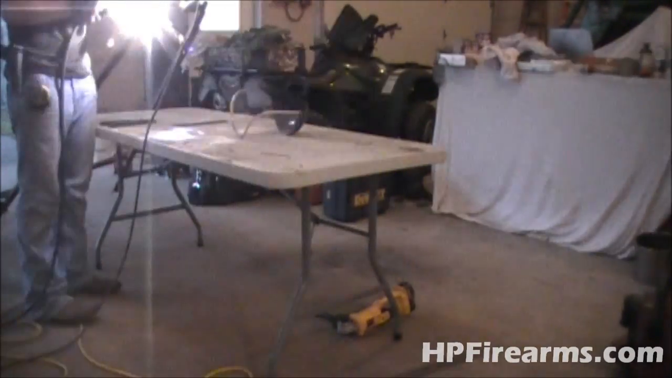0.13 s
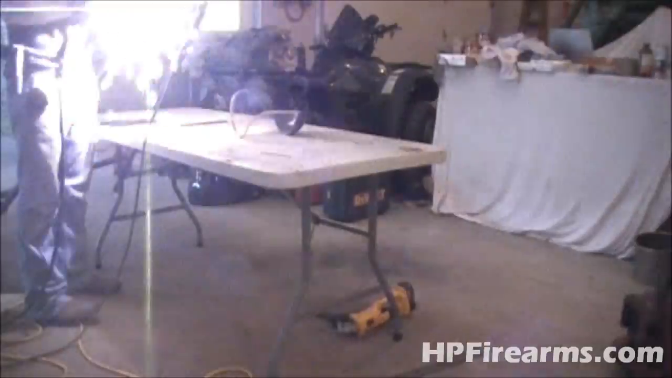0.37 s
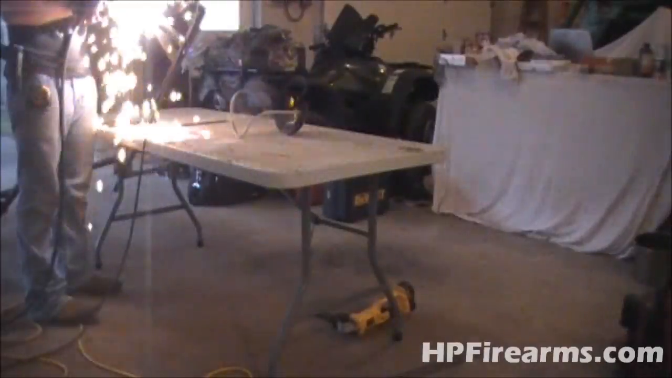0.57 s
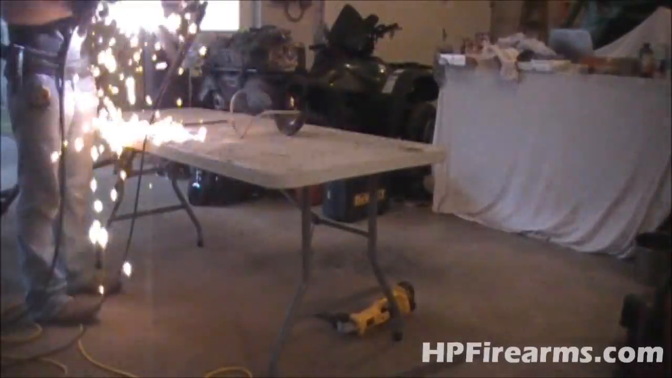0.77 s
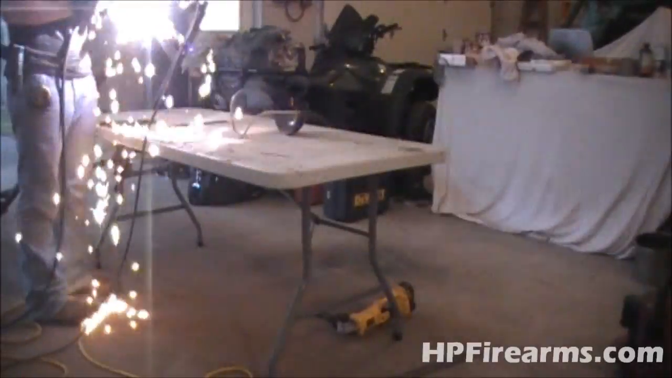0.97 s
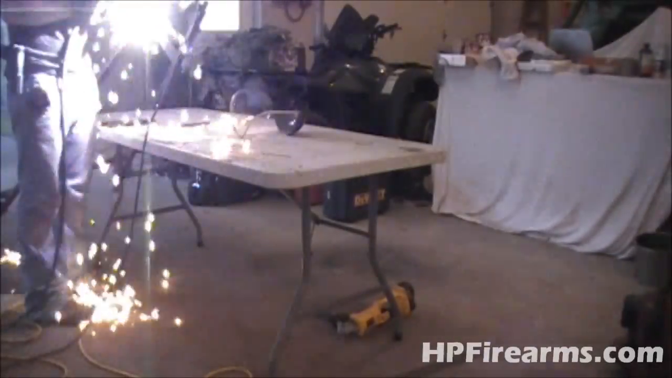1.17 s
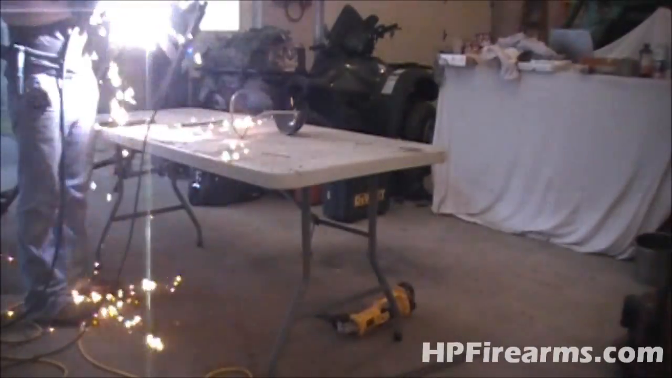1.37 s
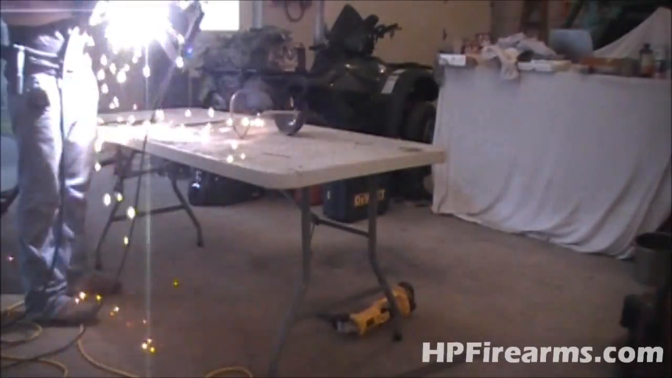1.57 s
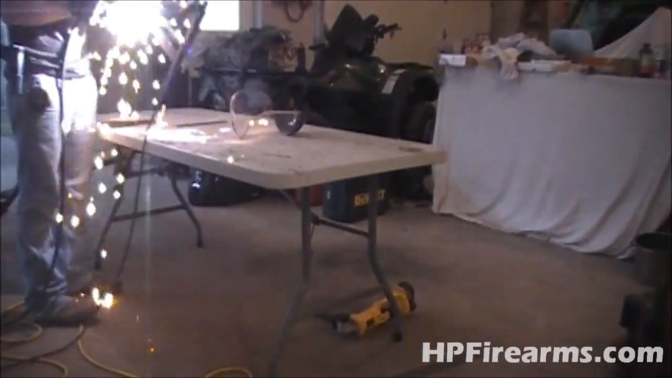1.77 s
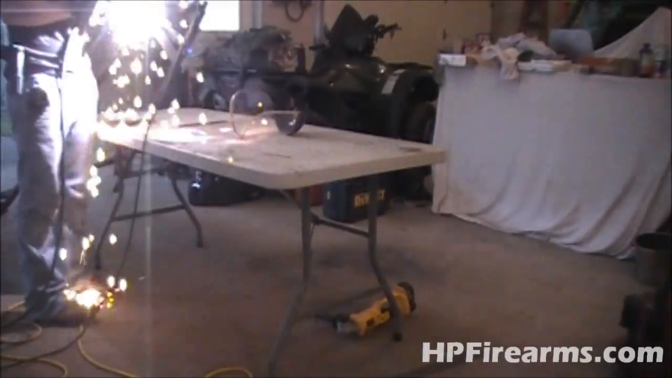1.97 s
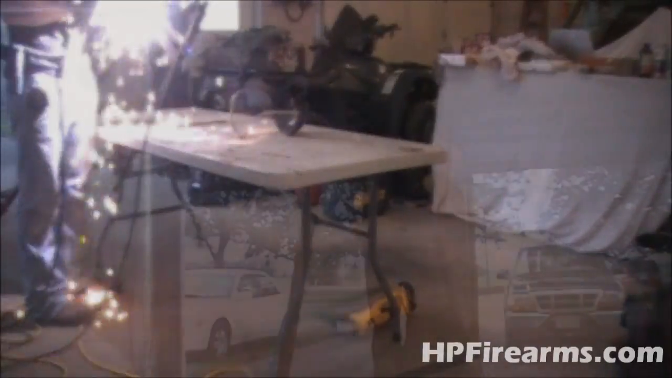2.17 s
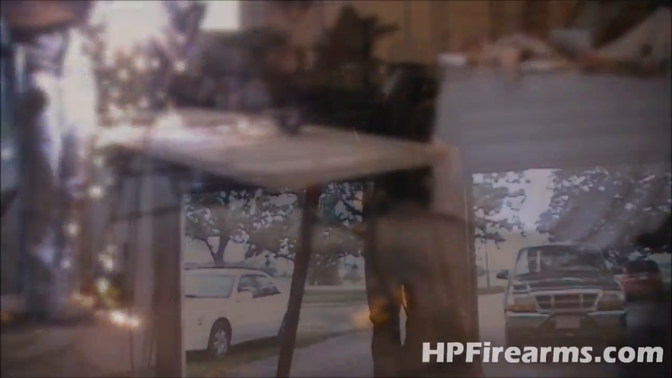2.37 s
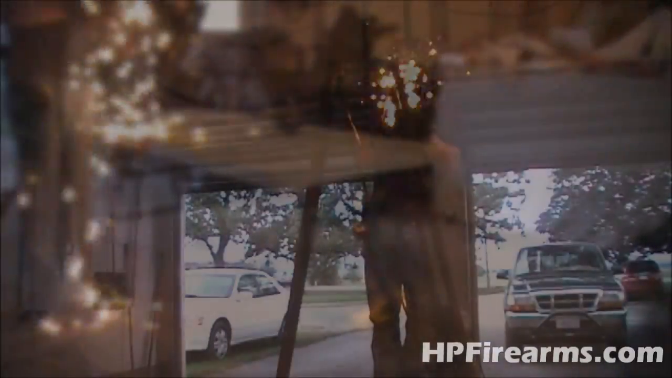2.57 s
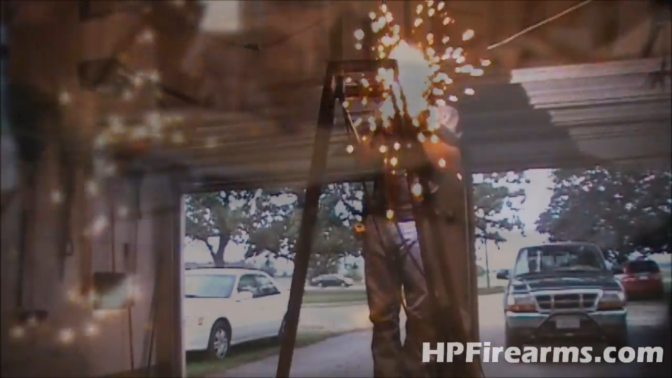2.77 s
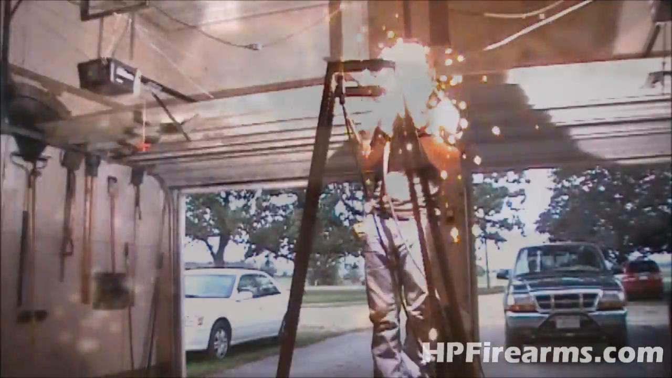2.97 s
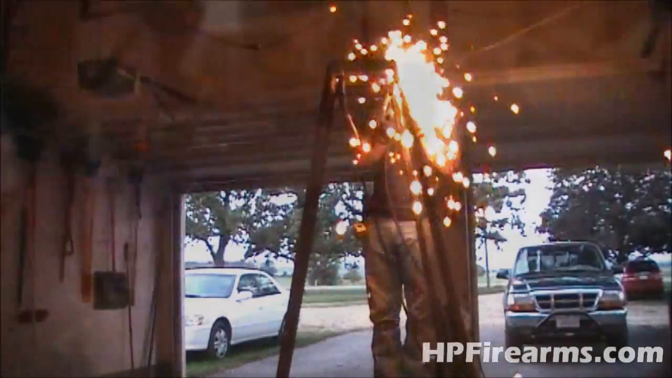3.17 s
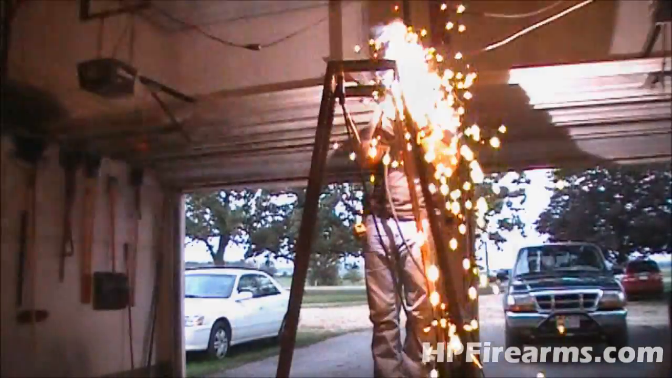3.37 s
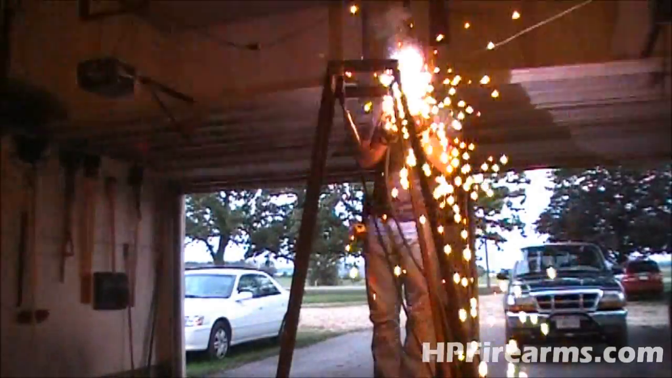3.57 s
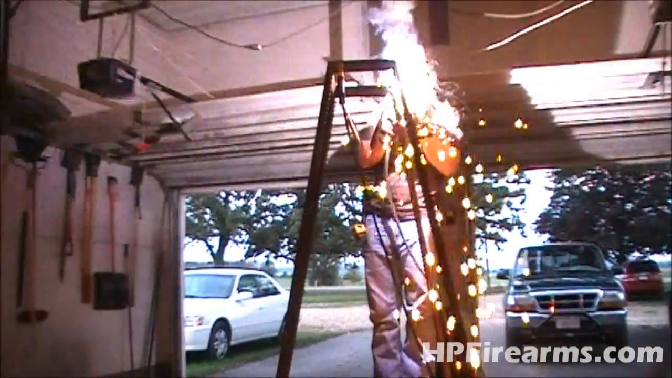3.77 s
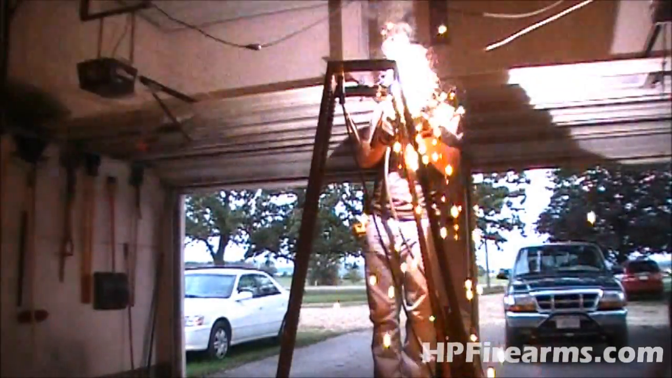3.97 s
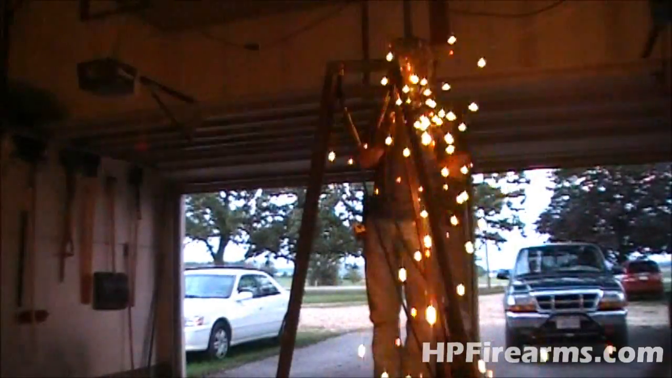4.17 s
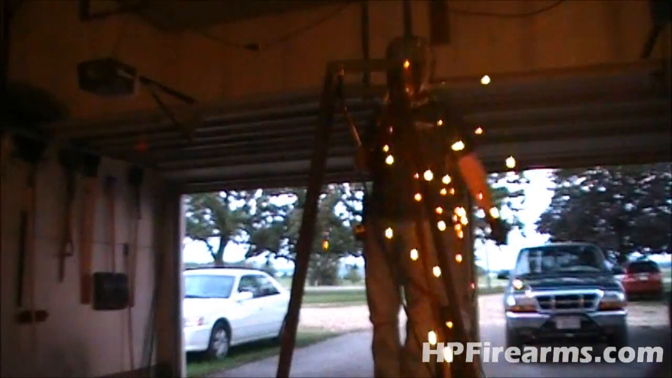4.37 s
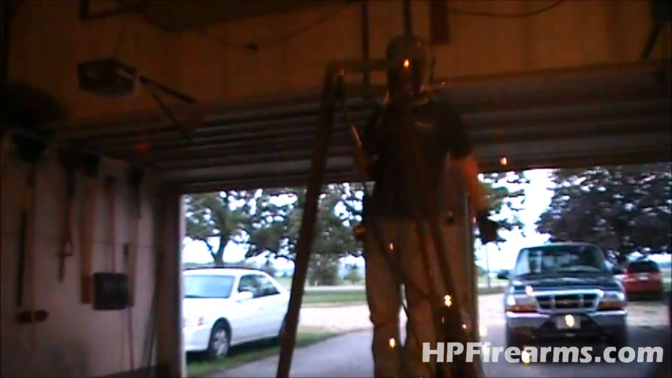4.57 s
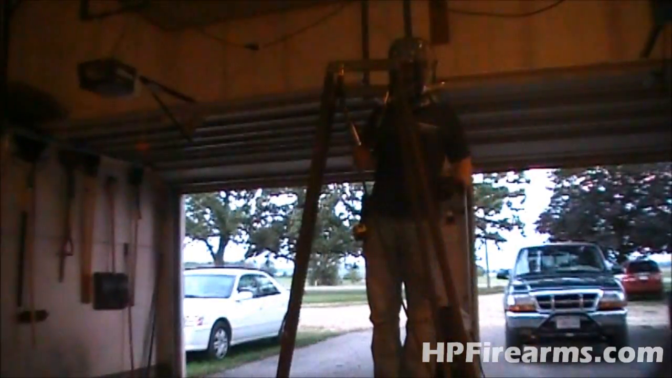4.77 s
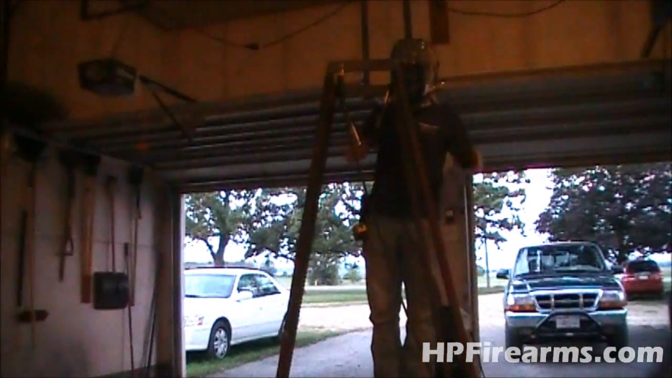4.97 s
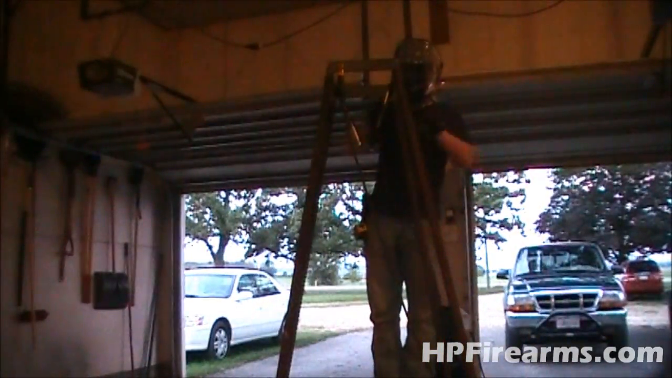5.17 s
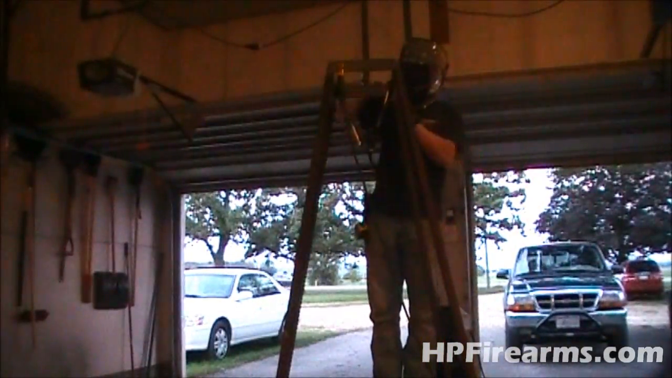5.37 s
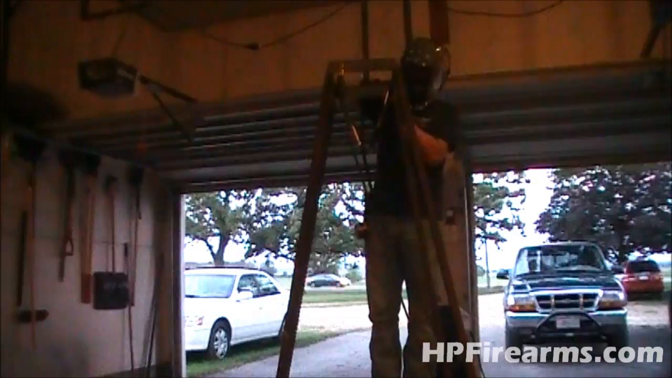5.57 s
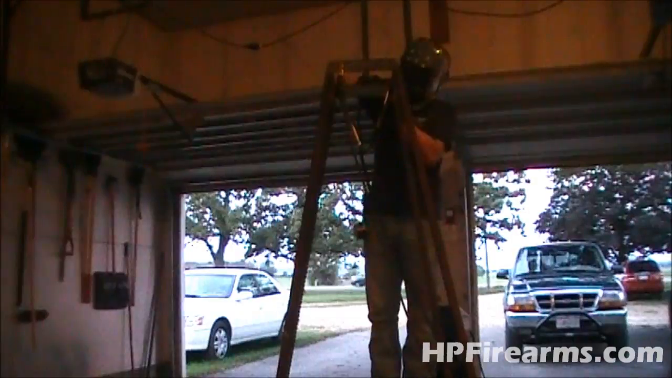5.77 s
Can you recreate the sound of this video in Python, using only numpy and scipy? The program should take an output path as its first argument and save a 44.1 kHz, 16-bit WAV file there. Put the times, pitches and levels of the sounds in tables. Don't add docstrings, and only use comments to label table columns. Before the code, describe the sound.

Bright, buzzing welding sizzle with sharp popping sparks echoes in a garage for four seconds, then stops, leaving a low steady fan hum.

```python
import sys
import numpy as np
from scipy import signal
from scipy.fft import rfft, irfft
from scipy.io import wavfile
from scipy.ndimage import uniform_filter1d

SR = 44100
rng = np.random.default_rng(int(sys.argv[2]) if len(sys.argv) > 2 else 0)


def to_wav(sig):
    pcm = np.clip(np.atleast_2d(sig), -1, 1) * 32767
    pcm = np.round(pcm).astype(np.int16)
    wavfile.write(sys.argv[1], SR, pcm.T)


def volts(x):
    e = np.asarray(x, float) / 20
    return 10 ** e


N = 257103
TIME = np.arange(N) / SR
CUT_S = 2.47
PEAKS_HZ = 120


def unit_rms(x):
    return x / np.sqrt(np.mean(x ** 2) + 1e-20)


def read(points, hz):
    f, value = np.transpose(points)
    return np.interp(np.log(hz + 1), np.log(f + 1), value)


def kernel(points, size=2048):
    gain_db = np.maximum(read(points, abs(np.fft.fftfreq(size, 1 / SR))), -90)
    log_spectrum = np.conj(signal.hilbert(np.log(volts(gain_db))))
    taps = np.fft.ifft(np.exp(log_spectrum)).real[:size // 2]
    return taps / np.linalg.norm(taps)


def resonate(x, hz, width_hz):
    turn = np.exp(2j * np.pi * hz * TIME)
    pole = np.exp(-np.pi * width_hz / SR)
    return 2 * (turn * signal.lfilter([1 - pole], [1, -pole], x / turn)).real


def wavering_tone(hz, width_hz):
    once = resonate(rng.standard_normal(N), hz, width_hz)
    return unit_rms(resonate(once, hz, width_hz))


def blade_hum(steady=.7, width_hz=6, fade_s=.15):
    # tone in Hz, start in seconds, end in seconds, level in dB.
    blade_tones = [
        (200.5, -1, 2.2, -51),
        (200, 2.2, 4.15, -44.5),
        (207.5, 2.1, 3.55, -44),
        (207, 4.1, 7, -50),
        (883, .3, .75, -50),
        (775, 4.9, 7, -50),
    ]
    out = np.zeros(N)
    for hz, start_s, end_s, db in blade_tones:
        sine = np.sqrt(2) * np.sin(2 * np.pi * hz * TIME)
        tone = steady * sine + np.sqrt(1 - steady ** 2) * wavering_tone(hz, width_hz)
        fade = np.clip(np.minimum(TIME - start_s, end_s - TIME) / fade_s + .5, 0, 1)
        out += volts(db) * tone * fade
    return out


def shaft_tone(hz=67, start_s=2.0, level_db=-60.5, kick_db=11, kick_s=.4):
    envelope_db = level_db + kick_db * np.exp(-abs(TIME - start_s) / kick_s)
    return np.sqrt(2) * (TIME > start_s) * volts(envelope_db) * np.sin(2 * np.pi * hz * TIME)


def air_roar(patchy_db=1.0, near_bass_db=-9, bass_hz=110):
    # frequency in Hz, level in dB per Hz.
    roar_colour = [(24, -50), (40, -48.5), (60, -22), (170, -15.5), (213, -7), (294, -8.5), (548, -8),
                   (621, -5), (797, -1), (1380, -4), (1730, -4.5), (2220, -12), (6980, -22), (14000, -49),
                   (15500, -77)]
    # frequency in Hz, side minus mid in dB.
    roar_side = [(60, -26), (150, -10), (380, -11.5), (950, -6), (2380, -6), (5980, -8), (9500, 5),
                 (15000, 8)]
    frames, hz = N // 256 + 5, np.fft.rfftfreq(1024, 1 / SR)
    a, b, c, d, patches = rng.standard_normal((frames, 513, 5)).T
    patches = uniform_filter1d(patches, size=10, axis=0)
    patches = unit_rms(uniform_filter1d(patches, size=12, axis=1))
    bass_db = near_bass_db * np.outer(1 / (1 + (hz / bass_hz) ** 4), np.arange(frames) * 256 / SR < 2)
    mid = a + 1j * b
    side = 0.098 * mid + 0.5 * (c + 1j * d)
    z = np.array([mid, side * volts(read(roar_side, hz))[:, None]])
    z = z * volts(read(roar_colour, hz)[:, None] + patchy_db * patches + bass_db)
    roar = signal.istft(z, nperseg=1024, noverlap=768)[1][:, :N]
    return roar / roar[0].std()


def fan():
    # time in seconds, level in dB.
    fan_level = [(0, -33.5), (.3, -37), (1.12, -39), (1.62, -32), (1.85, -30.5), (1.995, -41),
                 (2.005, -28.5), (2.39, -28.5), (2.6, -32.5), (3.3, -32.5), (4.0, -33), (4.3, -36),
                 (5.2, -34.5), (5.55, -32), (5.83, -31.5)]
    # tone in Hz, width in Hz, level in dB.
    roar_tones = [(238, 12, -19), (361, 10, -25), (511, 10, -22), (623, 6, -14), (775, 10, -18)]
    level = volts(np.interp(TIME, *np.transpose(fan_level)))
    tones = sum(volts(db) * wavering_tone(hz, width_hz) for hz, width_hz, db in roar_tones)
    hum = blade_hum() + shaft_tone() + tones * level * volts(-8 * (TIME < 2))
    return air_roar() * level + hum * volts([[0], [-25]])


def tail(gap_ms=0.44):
    # frequency in Hz, t60 in seconds.
    decay = [(250, 2.5), (1000, 2.19), (3000, 1.14), (7000, 0.89), (12000, 0.53)]
    hz, t, z = signal.stft(rng.standard_normal((2, SR + SR // 4)), SR, nperseg=256)
    z = z * volts(-60 * t / read(decay, hz)[:, None])
    taps = signal.istft(z, SR, nperseg=256)[1]
    taps = taps * np.clip(np.arange(taps.shape[1]) / (gap_ms * SR / 1000), 0, 1) ** 2
    return taps / np.linalg.norm(taps, axis=1, keepdims=True)


def garage(x, turns_per_s=1.33):
    out = np.zeros((2, N))
    for k in range(3):
        share = np.sqrt(2 / 3) * np.cos(np.pi * (turns_per_s * TIME + k / 3))
        out += signal.fftconvolve((x * share)[None], tail(), axes=1)[:, :N]
    return out


def ports(x, lag_samples=3.46):
    # frequency in Hz, side minus mid in dB.
    port_side = [(300, -39), (1000, -22), (2000, -20), (4000, -16), (6300, -18), (7600, -14), (8800, -4.5),
                 (10000, 1.5), (11500, -2), (13000, -6.5), (15000, -5)]
    hz = np.fft.rfftfreq(N, 1 / SR)
    delay = np.exp(-2j * np.pi * hz * lag_samples / SR)
    return irfft(rfft(x) * volts(read(port_side, hz)) * delay, N)


def camera_db():
    # start in seconds, depth in dB, creep back in dB/s, let go in seconds.
    ducks = [
        (.196, -4.5, 17, 0.61),
        (1.853, -4.5, 24, 2.2),
    ]
    return sum(np.minimum(db + creep * (TIME - s), 0) * (TIME >= s) * (TIME < end_s)
               for s, db, creep, end_s in ducks)


def peak_phase(seconds):
    return np.where(seconds < CUT_S, .04, .75)


def arc_control(strike_s=.018, flare_s=.043, body_kept=.1, flutter_db=1.2, flutter_s=.012):
    # time in seconds, level in dB, gain of the body below about 2 kHz in dB.
    arc_curve = [(0, -18, -4), (.18, -26, 15), (.24, -18, -20), (.44, -27.5, 12.5), (.5, -23.5, -4),
                 (.68, -21.5, 3.5), (.93, -22, 0), (1.1, -27.5, -3.5), (1.42, -19.5, -2.5),
                 (1.84, -21.5, 3), (1.99, -21, 3), (2.03, -19.5, 4), (2.42, -19, 3), (2.8, -21, 4.5),
                 (3.1, -19, 5), (3.99, -19.5, 1), (4.04, -17, -2.5), (4.13, -44, -9)]
    # strike in seconds, dying time in seconds, depth in dB, flare in dB.
    shorts = [(.23, .04, -6, -13), (.472, .03, 0, 0), (.607, 0.21, -5, 1), (0.787, 0.12, -11, -7),
              (1.03, 0.041, 2.5, -3), (1.5, 0.085, -9.5, 1.5), (2.2, 0.14, -6.5, -3),
              (2.3, 0.043, -16, -12), (2.486, 0.11, -10, 11.5), (2.684, 0.21, -15, 1.5),
              (3.2, 0.079, -8.5, 2), (3.5, 0.077, -4, -2)]
    s, curve_db, body_db = np.transpose(arc_curve)
    dips_db, flares_db = np.zeros((2, N))
    for at, dying_s, depth_db, flare_db in shorts:
        dips_db += depth_db * np.interp(TIME, [at - dying_s, at - strike_s / 2, at + strike_s / 2], [0, 1, 0])
        rise = np.clip((TIME - at) / strike_s, 0, 1)
        flares_db += flare_db * np.exp(-np.maximum(TIME - at, 0) / flare_s) * rise
    knots_s = np.arange(0, TIME[-1] + .1, .01)
    drift = signal.lfilter([1], [1, -np.exp(-.01 / flutter_s)], rng.standard_normal(len(knots_s)))
    flutter = np.interp(TIME, knots_s, unit_rms(drift))
    level_db = np.interp(TIME, s, curve_db) + dips_db + flares_db + flutter_db * flutter
    level_db = level_db - 100 * (TIME > s[-1])
    return level_db, np.interp(TIME, s, body_db) - body_kept * dips_db


def sparks(level_db, body_db, per_s=2600, spread_db=3.5, sharp=1.3, body_hz=2200):
    crowd = np.exp(sharp * np.cos(2 * np.pi * (PEAKS_HZ * TIME - peak_phase(TIME))))
    fires = rng.random(N) < per_s / SR * crowd / crowd.mean()
    size = np.minimum(rng.exponential(1, N), 3.5)
    train = unit_rms(fires * volts(spread_db * size))
    body = signal.lfilter(*signal.butter(2, body_hz, fs=SR), train)
    train = train + (volts(body_db) - 1) * body
    return train * volts(level_db)


def pops(level_db, trim_db=-2, edge=0.3, thump_hz=950):
    # time in seconds, peak in dB.
    near_pops = [(.0179, -1), (.0407, -1.5), (.0919, -3.9), (.1666, -2.9), (.1919, -.4), (.233, -.2),
                 (.2824, -.3), (.4743, .8), (.4992, -4.2), (.5398, -4.2), (.7183, -4.8), (.79, -4.5),
                 (.8906, -4.8), (.9422, -2.9), (1.0395, -3.4), (1.0818, -2.5), (1.2494, -4.4),
                 (1.4343, -.7), (1.4484, -1.8), (1.6837, -2), (1.7561, -4.3), (1.8489, -1.8),
                 (2.0589, -4.1), (2.0834, -4.2), (2.1406, -1.6), (2.2578, -2.7), (2.2663, -2),
                 (2.3493, -3.6), (2.3669, -3), (2.3745, -2.1)]
    # time in seconds, peak in dB.
    far_pops = [(2.4889, -3.6), (2.4975, .9), (2.6907, -2.3), (2.7135, -2.9), (2.7301, .3), (2.8863, -1.4),
                (2.905, -2.5), (2.9101, -2.5), (3.204, -.4), (3.2311, -1), (3.2459, -.9), (3.3149, -3.4),
                (3.3989, -1.4), (3.5828, -2.6), (3.7024, -3.2), (3.7493, -2.6), (3.8409, -3.9),
                (3.9552, -.7), (3.9656, -2.5), (3.9732, -1.5), (4.0386, -1.4), (4.1071, -8.9),
                (4.3786, -18.1)]
    # time in seconds, level in dB.
    slag_bursts = [(.4743, -17), (2.688, -16), (2.713, -6), (2.7308, -20), (3.2311, -15), (4.0382, -24)]
    chance, over_db, size_db, jitter_ms = .3, 14.5, 1, .9
    large, gain_db = [*near_pops, *far_pops], camera_db()
    snaps, thumps = np.zeros((2, N))

    turns = np.arange(1, 500)
    pick = rng.random(len(turns))
    size, jitter = rng.standard_normal((2, len(turns)))
    peak_s = (turns + peak_phase(turns / PEAKS_HZ)) / PEAKS_HZ + jitter * jitter_ms / 1000
    at = (peak_s * SR).astype(int)
    spent = (abs(peak_s[:, None] - np.transpose(large)[0] + .006) < .012).any(1)
    snaps[at] = (pick < chance) * ~spent * volts(level_db[at] + over_db + size_db * size + trim_db)

    for s, db in large:
        snaps[round(s * SR) - 2] += volts(db + trim_db - gain_db[round(s * SR)])
    for s, db in slag_bursts:
        thumps[round(s * SR) - 8] -= volts(db + 29.5)
    snaps = signal.lfilter([1 + edge, -edge], [1], snaps)
    thump_band = signal.butter(3, [thump_hz / 2.4, thump_hz * 2], "band", fs=SR)
    return snaps, signal.lfilter(*thump_band, thumps)


def place(arc, here, colour, echoes, dry_db, wet_db, alike, side_db, thump_wet=.4):
    response = kernel(colour)
    sizzle, snaps, thumps = arc
    blasts = here * -(sizzle * volts(dry_db) + snaps / abs(response).max() - thumps)
    blasts = signal.sosfilt(signal.butter(2, 260, "high", fs=SR, output="sos"), blasts)
    early = blasts.copy()
    for ms, db in echoes:
        weave = 1 + .035 * np.sin(2 * np.pi * (1.7 * TIME + rng.random()))
        lag = (ms * SR / 1000 * weave).round().astype(int)
        early += volts(db) * blasts[np.maximum(np.arange(N) - lag, 0)]
    wet = volts(wet_db) * garage(blasts - (1 - thump_wet) * here * thumps)
    side_wet = alike * wet[0] + np.sqrt(1 - alike ** 2) * wet[1]
    both = [early + wet[0], early + side_wet]
    mid, side = signal.oaconvolve(both, response[None], axes=1)[:, :N]
    return np.array([mid, volts(side_db) * ports(side)])


def scene():
    # frequency in Hz, level in dB per Hz.
    near_colour = [(290, -35.5), (500, -17.5), (553, -23), (696, -23), (759, -20), (902, -19), (1010, -21),
                   (1940, -5.5), (2940, -10.5), (3390, -9), (5460, -5), (7280, 0), (8280, -6),
                   (13500, -18.5), (15600, -33.5)]
    # frequency in Hz, level in dB per Hz.
    far_colour = [(290, -40), (500, -11), (569, -23), (621, -11), (770, -13.5), (1090, -7.5), (1390, -7),
                  (1750, -5.5), (1910, -3.5), (5540, -1), (6870, 4), (7820, 0), (12800, -17.5),
                  (14300, -20), (15600, -61.5)]
    # delay in ms, level in dB.
    near_echoes = [
        (.28, -7),
        (2.45, -7),
        (3.3, -9),
        (7.5, -13),
        (9.3, -12),
        (10, -12),
    ]
    # delay in ms, level in dB.
    far_echoes = [(1.2, -6), (3.45, -8), (4.65, -11), (9, -11)]
    level_db, body_db = arc_control()
    arc = (sparks(level_db, body_db), *pops(level_db))
    near = place(arc, TIME < CUT_S, near_colour, near_echoes, dry_db=-4.0, wet_db=1.5, alike=0.3, side_db=3.0)
    far = place(arc, TIME >= CUT_S, far_colour, far_echoes, dry_db=-5.5, wet_db=3.0, alike=0.15, side_db=3.5)
    mid, side = near + far + fan()
    return np.array([mid + side, mid - side])


def drop_masked_bands(x, mask_db=-40, top_db=-49, top_hz=11500):
    hz, t, z = signal.stft([x[0] + x[1], x[0] - x[1]], SR, nperseg=2048, noverlap=1024)
    band = (11 * np.log2(1 + hz / 1500)).astype(int)
    bands = band.max() + 1
    power = np.array([(abs(z[:, band == b]) ** 2).mean(1) for b in range(bands)])[band]
    treble = (abs(z[0, hz > 4000]) ** 2).sum(0)
    swing_db = 1.8 * unit_rms(uniform_filter1d(rng.standard_normal(len(t)), size=4))
    luck_db = 1.5 * rng.standard_normal((len(t), bands)).T[band]
    side_heard = power[:, 1] > treble * volts(mask_db + swing_db + luck_db) ** 2
    z[1] *= side_heard | (abs(hz[:, None] - 4600) > 3300)
    lines = uniform_filter1d(abs(z[0]) ** 2, size=4, axis=0)
    z *= (lines > treble * volts(top_db + swing_db / 2) ** 2) | (hz[:, None] < top_hz)
    mid, side = signal.istft(z, SR, nperseg=2048, noverlap=1024)[1][:, :N] / 2
    return np.array([mid + side, mid - side])


def roll_off(x):
    return signal.sosfilt(signal.butter(12, 15760, fs=SR, output="sos"), x)


def record(dry):
    dry = signal.sosfilt(signal.butter(2, 52, "high", fs=SR, output="sos"), dry)
    ducked = dry * volts(camera_db())
    limited = ducked / (1 + abs(ducked / .92) ** 6) ** (1 / 6)
    return roll_off(drop_masked_bands(limited))


dry = scene()
out = record(dry)
to_wav(out)
```